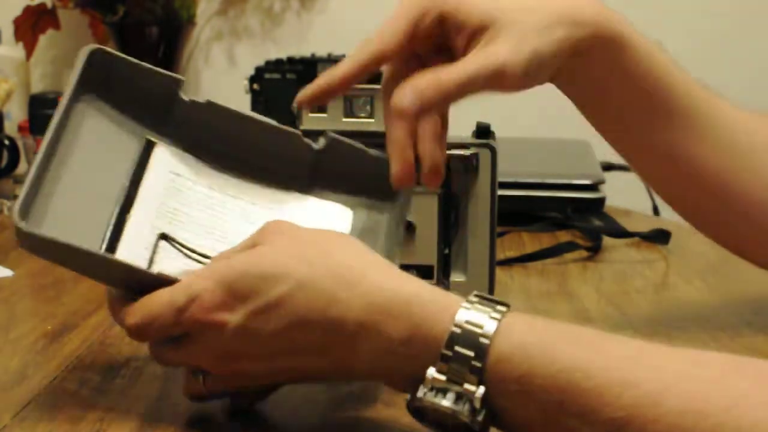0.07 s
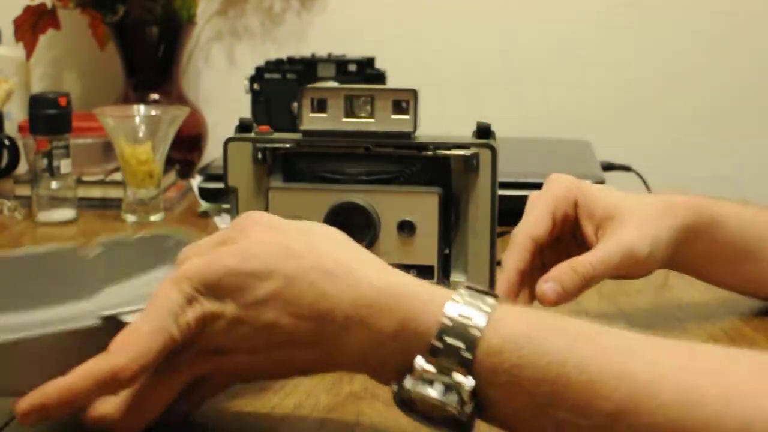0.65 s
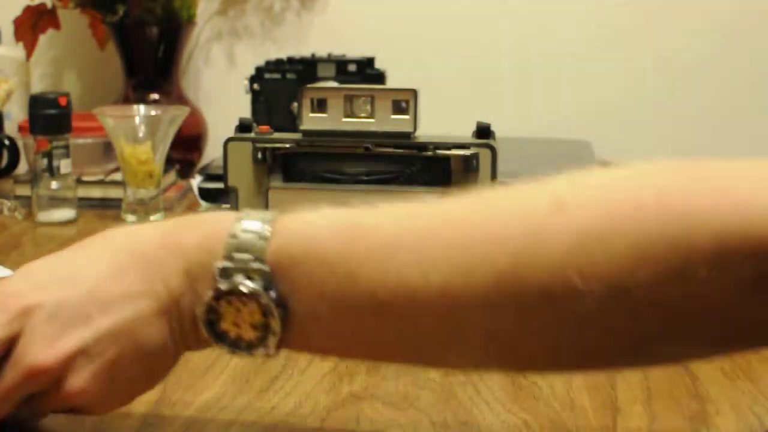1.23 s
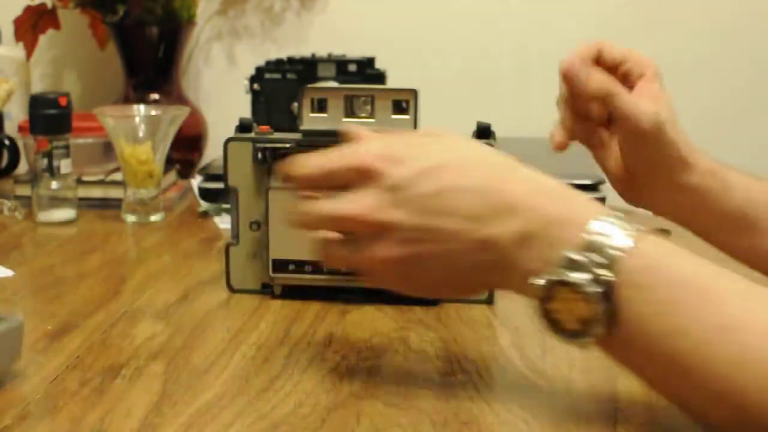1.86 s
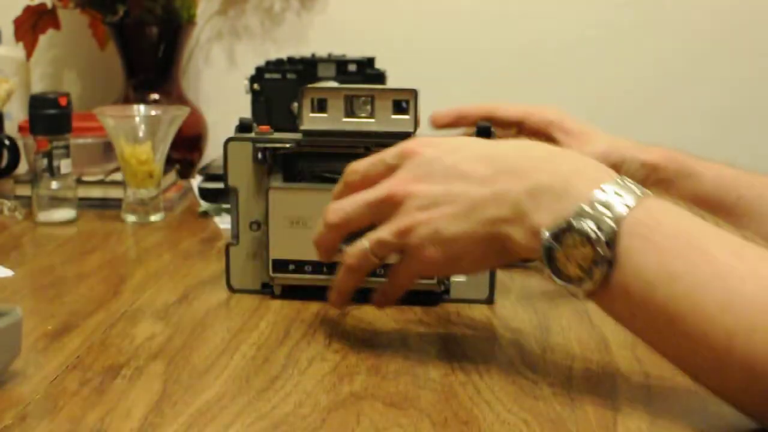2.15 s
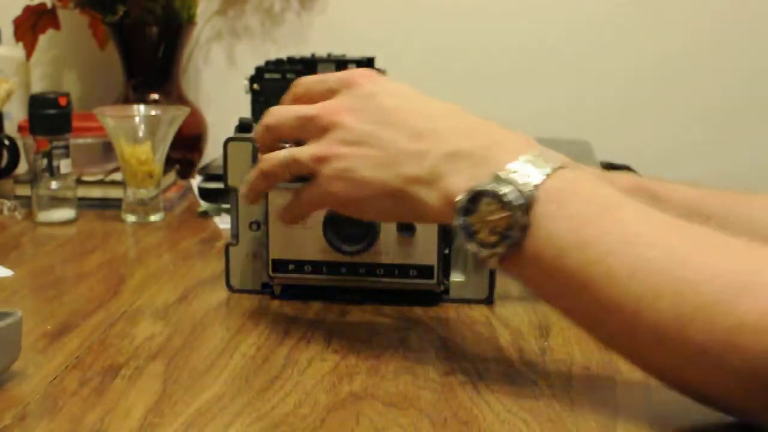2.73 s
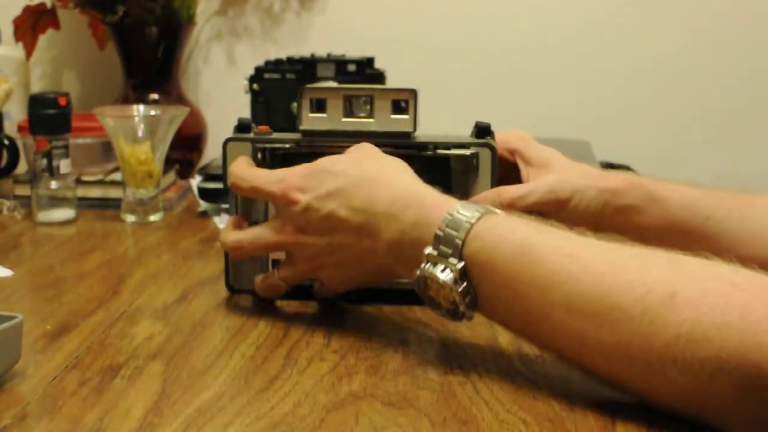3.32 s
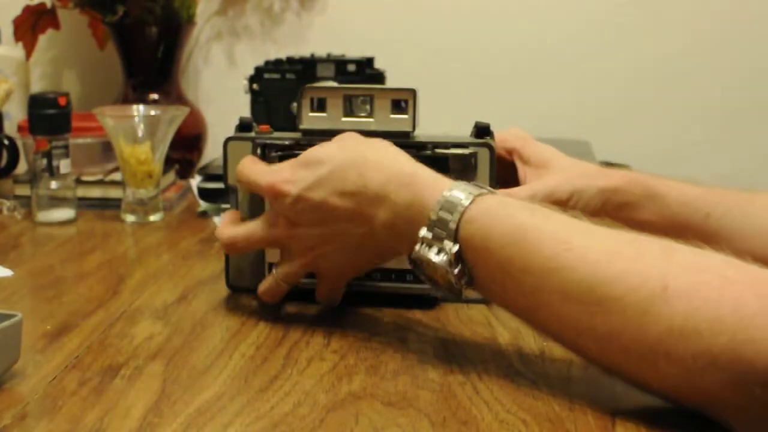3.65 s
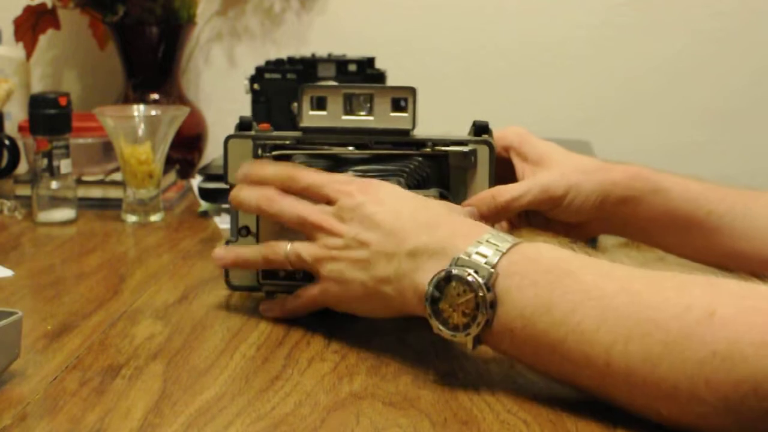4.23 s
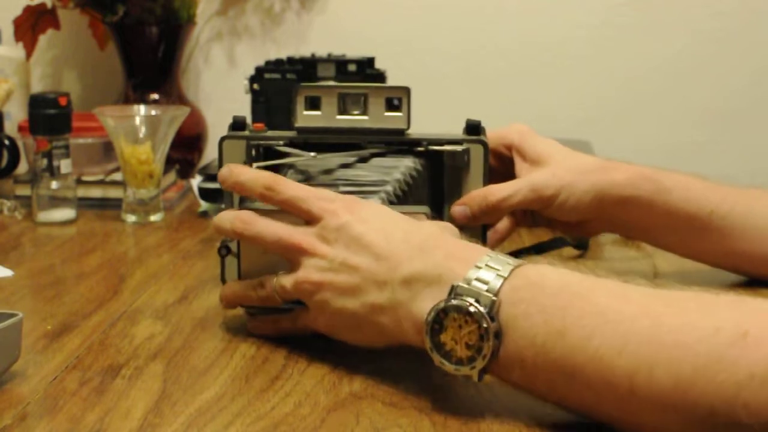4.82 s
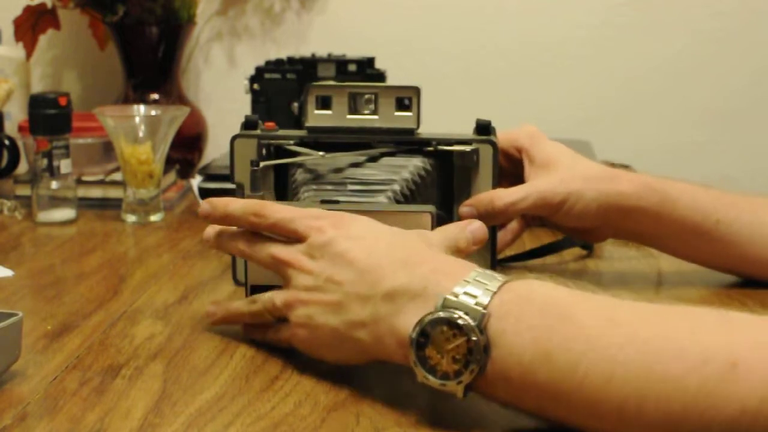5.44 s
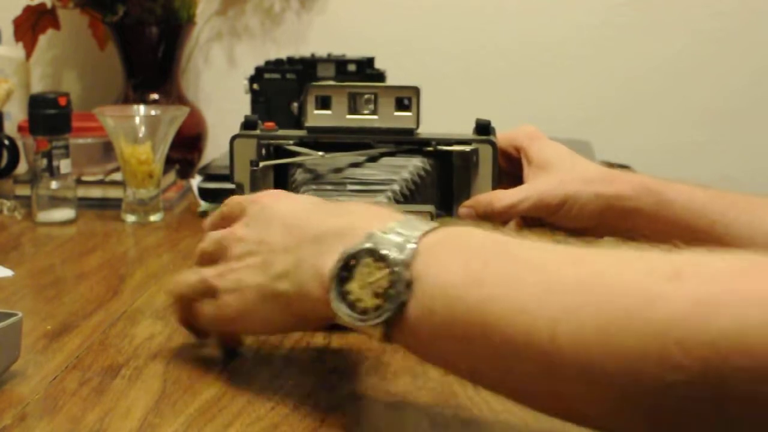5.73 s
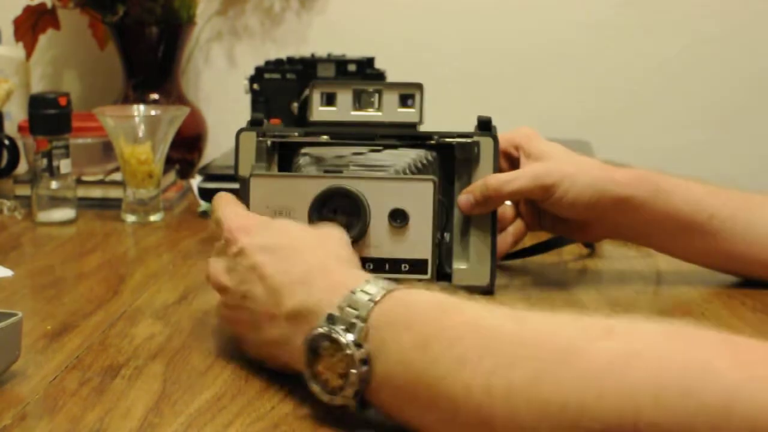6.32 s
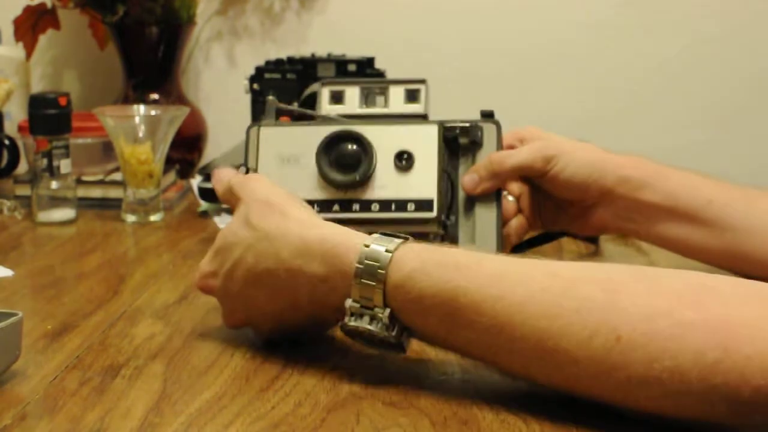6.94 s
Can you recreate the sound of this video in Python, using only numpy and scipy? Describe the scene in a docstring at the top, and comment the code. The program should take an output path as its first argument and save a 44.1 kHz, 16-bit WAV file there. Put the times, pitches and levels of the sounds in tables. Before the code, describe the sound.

A faint fan hums steadily in a small room. At about 0.9 seconds a hollow plastic cover taps sharply on a wooden table, then at 1.5 drops flat with a loud, quick bouncing clatter. Soft hand brushes and bumps follow until about 2.5. Around 3 seconds a folding camera gives a few small clicks, and at 3.6 its latch lets go with a sharp snap. The leather bellows creak quietly near 3.9, and a click comes at 4.2. Steel struts scrape briefly and lock at 4.5 with a very loud snap that rings the camera body, followed by a smaller one at 4.8. From 5 seconds to about 7, light irregular metal clicks and faint sliding continue as the front is pushed back in. The microphone is a little dull and overloads slightly on the hardest peak.

```python
"""A folding camera is unlatched and opened: leather bellows creak by stick-slip, steel struts scrape out
and lock with a snap that rings the body. Small clicks follow as the front is pushed back in.
Before that, its hollow plastic cover taps a wooden table, drops flat and bounces. Hands brush and bump;
a faint fan hums in the small room. The microphone is dull above 5 kHz and overloads on the hardest peak."""
import sys
import numpy as np
from scipy import signal
from scipy.fft import rfft
from scipy.io import wavfile

SR = 44100
rng = np.random.default_rng(int(sys.argv[2]) if len(sys.argv) > 2 else 0)


def master(y):
    """Save y as 16-bit WAV."""
    cut = np.clip(np.atleast_2d(y).T, -1, 1)
    pcm = np.round(cut * 32767)  # scale
    wavfile.write(sys.argv[1], SR, pcm.astype(np.int16))


N = 316197

# edges of the thud, knock, clack and snap bands: f/Hz
BAND_EDGES_HZ = [150, 500, 1100, 2500, 6000]


def amp(db):
    """Decibels to gain."""
    return 10 ** (np.asarray(db) / 20)


def unit(x):
    """Scale to energy 1."""
    return x / np.sqrt(np.sum(x ** 2) + 1e-20)


def read(points, hz):
    """Interpolate on a log-frequency axis."""
    f, value = np.transpose(points)
    return np.interp(np.log(hz + 1), np.log(f + 1), value)


def add(mix, s, sound):
    """Mix a sound in at time s."""
    part = mix[max(round(s * SR), 0):][:len(sound)]
    part += sound[:len(part)]


def colour(x, points, size=4096):
    """Minimum-phase filter through (f/Hz, gain/dB); attacks stay sharp."""
    log_gain = np.log(amp(read(points, abs(np.fft.fftfreq(size, 1 / SR)))))
    taps = np.fft.ifft(np.exp(signal.hilbert(log_gain).conj())).real[:size // 2]
    return signal.oaconvolve(x, taps)[:len(x)]


def drift(rate_hz):
    """Slow random wander."""
    knots = rng.standard_normal(1000)
    return np.interp(np.arange(N) / SR * rate_hz, np.arange(len(knots)), knots)


def room_tail(build_s=0.002, size=256):
    """Dense reflections: fast build-up, each band with its own decay."""
    # reverberant against direct sound: f/Hz, level/dB
    wet = [(100, -16.5), (175, 3), (240, 7), (380, 4.5), (700, -0.5), (1400, -7.5), (2800, -3), (5000, -8)]
    # room decay: f/Hz, t60/s
    decay = [(100, 0.35), (350, 0.36), (800, 0.4), (1500, 0.33), (3000, 0.36), (5500, 0.38)]
    hz, t, noise = signal.stft(rng.standard_normal(SR // 2), SR, nperseg=size)
    rate = np.log(1000) / read(decay, hz)[:, None]
    gain = np.sqrt(2 * rate / SR) * amp(read(wet, hz))[:, None]
    tail = signal.istft(noise * np.exp(-rate * t) * gain, SR, nperseg=size)[1]
    return tail * (1 - np.exp(-(np.arange(len(tail)) / SR / build_s) ** 2))


def strokes(rows):
    """Rubbing pressure: one bell-shaped swell per stroke."""
    t = np.arange(N) / SR
    return np.sqrt(sum((amp(db) * np.exp(-(2 * (t - s) / length) ** 2)) ** 2 for s, db, length in rows))


def rub(pressure, spectrum, per_s, spread_db, room_db):
    """Friction: many tiny uneven catches, scaled by pressure."""
    catches = (rng.random(N) < per_s / SR) * rng.standard_normal(N)
    catches *= amp(spread_db * np.minimum(rng.exponential(1, N), 4))
    direct = np.sqrt(N) * unit(colour(catches, spectrum)) * pressure
    return direct + amp(room_db) * signal.fftconvolve(direct, room_tail())[:N]


def contacts(rows, shares_db, lift_db=0, lift_octaves=0.5, pivot_hz=1100):
    """Hardness tilts the four band shares upward; a struck spot lifts those near its pitch."""
    centres_hz = np.sqrt(np.multiply(BAND_EDGES_HZ[:-1], BAND_EDGES_HZ[1:]))
    octaves = np.log2(centres_hz / pivot_hz)
    out = []
    for s, db, hardness, *spot_hz in rows:
        lift = sum(lift_db * np.exp(-(np.log2(centres_hz / hz) / lift_octaves) ** 2) for hz in spot_hz)
        out.append((s, db, *(np.array(shares_db) + hardness * octaves + lift), *spot_hz))
    return out


def rebounds(rows, after_s, gain_db):
    """Loose parts strike again, later and weaker."""
    delays = after_s * (.5 + rng.random(len(rows)))
    return [(s + delay, db + gain_db, *rest) for (s, db, *rest), delay in zip(rows, delays)]


def blows(rows, modes, dense_db, dense_t60_s, room_db, sub_db, spot_db=0, spot_t60_s=.03, scatter=1):
    """Each contact rings the main modes, any struck spot and a dense mass of small modes."""
    size = 8192
    t, hz, out = np.arange(size) / SR, np.fft.rfftfreq(size, 1 / SR), np.zeros(N)
    dying = lambda t60: np.exp(-np.log(1000) * t / t60)
    shapes = np.array([amp(db) * dying(t60) * np.exp(2j * np.pi * f * t) for f, db, t60 in modes])
    bands = list(zip(BAND_EDGES_HZ, BAND_EDGES_HZ[1:]))
    centres_hz = [np.sqrt(lo * hi) for lo, hi in bands]
    for s, db, thud, knock, clack, snap, *spot_hz in rows:
        # scatter 1: many parts, modes start out of step; 0: plain shell, in step
        phases = np.exp(2j * np.pi * scatter * rng.random(len(modes)))
        ring = unit((phases[:, None] * shapes).sum(0).imag)
        spot = sum(unit(dying(spot_t60_s) * np.sin(2 * np.pi * f * t)) for f in spot_hz)
        dense = unit(rng.standard_normal(size) * dying(dense_t60_s))
        hit = ring + amp(spot_db) * spot + amp(dense_db) * dense
        band_db = db + np.array([thud, knock, clack, snap])
        for _ in range(2):  # set band levels, as energy spread over 2 ms
            power = abs(rfft(hit)) ** 2 / size / (SR * .002)
            own_db = [10 * np.log10(power[(hz >= lo) & (hz < hi)].sum()) for lo, hi in bands]
            hit = colour(hit, list(zip(centres_hz, band_db - own_db)))
        # small things radiate little bass
        hit = colour(hit, [(25, sub_db - 10.5), (110, sub_db), (170, -11.0), (230, -0.5)])
        add(out, s, hit)
        add(out, s, amp(room_db) * signal.fftconvolve(hit, room_tail()))
    return out


def fan(air_db=-53.5, waver=0.0031):
    """Small fan: steady air noise and slightly wavering tones."""
    # air noise: f/Hz, level/dB
    spectrum = [(20, -14), (60, -14.5), (100, -11.5), (135, -8), (165, -7.5), (215, -2.5), (330, -4),
                (500, -9), (740, -6), (1200, -13.5), (2000, -15.5), (3200, -22), (4700, -22), (6000, -22)]
    # hum: f/Hz, rms level/dB
    tones = [(204.6, -60.5), (409.1, -61), (586.8, -67), (613.7, -71.5), (732.1, -68.5), (1330, -95)]
    air = amp(air_db) * np.sqrt(N) * unit(colour(rng.standard_normal(N), spectrum))
    clock_s = np.cumsum(1 + waver * drift(12)) / SR
    hum = sum(amp(db + drift(11)) * np.sin(2 * np.pi * (hz * clock_s + rng.random())) for hz, db in tones)
    return air + np.sqrt(2) * hum


def metal_slide(pull_s=4.25, lock_s=4.499, pull_db=-25.5, surge_s=0.023, steepness=1.48):
    """Metal on metal: light strokes, and struts scraping ever harder until they lock."""
    # strokes: mid t/s, level/dB, length/s
    slides = [(.48, -59.5, .13), (3.2, -57.5, 0.32), (3.52, -54.5, 0.089), (3.93, -61, 0.25),
              (4.95, -54, .27), (5.505, -47.5, 0.057), (6.3, -53, 0.16), (6.53, -56.5, 0.18),
              (6.82, -57, 0.36)]
    # sliding metal: f/Hz, level/dB
    spectrum = [(100, -15), (400, -5), (900, 0), (1500, -3.5), (2500, -8.5), (3500, -6.5), (4700, -6.5),
                (6000, -14.5)]
    left_s = lock_s - np.arange(N) / SR
    pulling = (left_s > 0) & (left_s < lock_s - pull_s)
    pull = amp(pull_db) * (1 + abs(left_s) / surge_s) ** -steepness * pulling
    return rub(strokes(slides) + pull, spectrum, per_s=6700, spread_db=1.5, room_db=0)


def hand_brush(grip_s=2.15, grip_db=-62):
    """Hands and leather rub body and table, loudest as the bellows pull taut."""
    # strokes: mid t/s, level/dB, length/s
    brushes = [(.85, -55.5, 1), (1.62, -50.5, 0.39), (1.85, -49.5, 0.086), (2.02, -52, 0.18),
               (3.72, -54, 0.25), (4.46, -49.5, 0.15), (4.565, -32.5, 0.077), (4.68, -51, 0.12),
               (6.58, -56, 0.3)]
    # skin and leather: f/Hz, level/dB
    spectrum = [(40, -32), (100, -8), (138, 10.5), (175, -10.5), (260, 0.5), (400, 9), (550, -5.5),
                (850, -0.5), (1500, -6.5), (3000, -20.5), (6000, -16.5)]
    grip = amp(grip_db) * (np.arange(N) / SR > grip_s)  # constant rustle once held
    return rub(np.hypot(strokes(brushes), grip), spectrum, per_s=1500, spread_db=2.5, room_db=-5.5)


def cover_taps(echo_s=.00292):
    """The rim of the hollow plastic cover taps and grazes the table."""
    # rim contacts: t/s, level/dB, hardness/(dB/octave)
    hits = [(.9033, -6, -0.5), (.964, -35.5, 9), (.982, -44, 14), (1.3285, -39, 6.5)]
    # shell modes: f/Hz, level/dB, t60/s
    modes = [(264, -22, .1), (390, -22, .08), (964, -13, .04), (1200, -7, .09), (1280, -9, .13),
             (1385, 0, .04), (1680, -5, .03), (1830, -9, .02), (2020, -9, .03), (2350, -15, .02),
             (2950, -20, .015), (3900, -20, .01), (4860, -25, .012)]
    taps = contacts(hits, shares_db=(-23, -17, -3, -24))
    shell = blows(taps, modes, dense_db=-9, dense_t60_s=.035, room_db=3.5, sub_db=-28, scatter=0)
    add(shell, echo_s, amp(-23) * shell)  # echo off the nearest surface
    shell = colour(shell, [(1400, -1), (2000, -3), (2800, 1), (4500, 5.5), (5600, -4.0)])  # soft plastic
    return shell + room_boom(taps, gain_db=-14.5, swell_s=0.03)


def room_boom(rows, gain_db, swell_s, mode_hz=136):
    """Each thud starts a low standing wave that swells and hangs on."""
    t, out = np.arange(SR) / SR, np.zeros(N)
    wave = t / swell_s * np.exp(1 - t / swell_s) * np.sin(2 * np.pi * mode_hz * t)
    for s, db, thud, *_ in rows:
        add(out, s, amp(gain_db + db + thud) * wave)
    return out


def table_knocks():
    """The wooden table rings as the cover drops, bounces and settles, and as the arm bumps it."""
    # cover landings: t/s, level/dB, hardness/(dB/octave)
    landings = [(1.444, -27, 1), (1.4523, -6, -0.5), (1.4543, -5.5, 1.5), (1.4695, -16.5, -2.5),
                (1.4765, -10, 0.6), (1.636, -34, 0.5), (1.762, -31, -3), (1.824, -39, 3.5)]
    # soft arm and hand bumps: t/s, level/dB
    bumps = [(1.665, -40), (1.86, -43), (1.962, -40.5), (2.058, -41), (2.254, -41.5), (2.551, -43),
             (4.076, -40.5)]
    # table modes: f/Hz, level/dB, t60/s
    modes = [(212.5, -8.5, 0.071), (304, -26, 0.11), (429, -5, 0.045), (447, -2, 0.037), (590, -18, 0.02),
             (755, -3, 0.039), (974, -5, 0.13), (1217, -1.5, 0.063), (1480, -11.5, 0.053), (2160, 2, 0.041),
             (2100, -18, 0.011), (2665, 4.5, 0.017), (2960, -4, 0.034), (3350, 9, 0.011),
             (3800, 8.5, 0.013), (4350, 8, 0.012), (5250, 12, 0.009)]
    knocks = contacts(landings, shares_db=(-14.5, -12, -9.5, -14.5))
    knocks += contacts([(s, db, 0) for s, db in bumps], shares_db=(-2.5, -11, -11.5, -22))
    wood = blows(knocks, modes, dense_db=3.5, dense_t60_s=0.086, room_db=-3.5, sub_db=-13)
    return wood + room_boom(knocks, gain_db=-21, swell_s=0.033)


def strut_clicks():
    """Steel struts and pivots click lightly and rebound."""
    # clicks: t/s, level/dB, hardness/(dB/octave), spot f/Hz
    hits = [(2.98, -29.5, 0.3, 904), (3.151, -39, 1, 5260), (3.158, -27.5, -1.5, 900),
            (4.107, -35, 3.3, 4360), (4.883, -33.5, 1.5, 2600), (4.968, -38.5, -0.5, 2660),
            (5.322, -38.5, 1.5, 3200), (5.394, -35, -1.5, 3120), (5.551, -37, -2, 4650),
            (5.594, -33, -1, 4270), (5.781, -29, 5.5, 5270), (5.784, -34, 0, 4100), (5.791, -42, 6.5, 2360),
            (5.911, -42.5, 1.5, 2940), (6.031, -49.5, 4.5, 4370), (6.149, -45.5, 0.5, 2800),
            (6.319, -35.5, 3.1, 4520), (6.48, -39, -1.5, 1670), (6.754, -36, 4.5, 4360),
            (6.809, -31.5, 4, 5200), (6.898, -44, 4.5, 3170), (7.078, -33.5, 4, 4200)]
    # strut modes: f/Hz, level/dB, t60/s
    modes = [(802, -3, .03), (1230, -7, .03), (1720, -6, .02), (2340, -1, .018), (2960, -3, .015),
             (3240, -6, .012), (3850, -6, .012), (4400, -1, .014), (4760, -1, .016), (5250, 3, .012),
             (5650, 5, .008)]
    clicks = contacts(hits, shares_db=(-20.5, -11, -12.5, -9))
    clicks += rebounds(clicks, after_s=.005, gain_db=-10.5)
    steel = blows(clicks, modes, dense_db=5.5, dense_t60_s=0.061, room_db=-2, sub_db=-14,
                  spot_db=-3.5, spot_t60_s=0.015)
    return colour(steel, [(300, -1.8), (700, 0.9)])  # thin steel: weak lows


def latch_snaps():
    """The camera body rings as the latch lets go, the struts lock and it shifts in the hand."""
    # snaps: t/s, level/dB, hardness/(dB/octave), spot f/Hz
    hits = [(3.082, -29, -2.5, 1020), (3.218, -26, -1.5, 1900), (3.2235, -39, -3.5, 677),
            (3.5707, -16, -1.5, 660), (3.575, -6, 1.2, 1895), (3.6825, -29.5, 0.5, 1780),
            (3.7215, -30, -1, 1880), (4.1865, -29, 1, 3400), (4.1923, -19.5, 3, 1026),
            (4.4995, -1.5, 2.5, 1584), (4.502, -9, -2.5, 430), (4.8035, -19.5, 3.5, 1286),
            (6.534, -30, -0.5, 1330)]
    # body modes: f/Hz, level/dB, t60/s
    modes = [(420, -5, .08), (620, -6, .035), (700, -7, .035), (855, 1, .045), (995, -4, .035),
             (1340, -3, .025), (1570, 0, .025), (1690, -3, .02), (1940, -4, .02), (2100, -6, .015),
             (2360, -3, .02), (2680, -7, .015), (3340, -5, .012), (3900, 0, .012), (4200, -4, .012),
             (4670, -2, .012), (5000, 2, .012)]
    snaps = contacts(hits, shares_db=(-23.5, -13.5, -16.5, -14), lift_db=7)
    rattle = rebounds(snaps, after_s=0.007, gain_db=-18)
    body = blows(snaps + rattle, modes, dense_db=6.5, dense_t60_s=0.05, room_db=-1.5, sub_db=-6.5,
                 spot_db=-2.5, spot_t60_s=0.017)
    return body + room_boom(snaps, gain_db=-17, swell_s=0.05)


def bellows_creak(from_s=3.873, to_s=3.99, jitter_s=0.0038, lesser_db=-36.5, fade_db_per_s=60,
                  slip_hz=1400, spread_octaves=0.28):
    """Folds stick and slip as they part: strong slips plus a fading run, each at its own pitch."""
    # strong slips: t/s, level/dB
    strong = [(3.845, -35.5), (3.865, -33), (3.891, -32.5), (3.9161, -30), (3.926, -35.5), (3.9599, -38),
              (4.366, -37)]
    # fold modes: f/Hz, level/dB, t60/s
    modes = [(680, -2.5, 0.009), (1080, 4.5, 0.013), (1465, -7.5, 0.004), (1736, -1.5, 0.0042),
             (4180, -23, 0.0014)]
    times_s = np.linspace(from_s, to_s, 7) + jitter_s * rng.standard_normal(7)
    lesser = [(s, lesser_db - fade_db_per_s * (s - from_s)) for s in times_s]
    shares_db = (-21, -5.5, -6, -16.5)
    slips = [(s, db, *shares_db, slip_hz * 2 ** (spread_octaves * rng.standard_normal()))
             for s, db in strong + lesser]
    creak = blows(slips, modes, dense_db=-3, dense_t60_s=.012, room_db=0.5, sub_db=-28.5,
                  spot_db=4, spot_t60_s=0.015)
    # soft leather dulls each slip
    return colour(creak, [(600, 2.5), (1000, -3.5), (1900, 1.5), (2700, -4.0), (5000, -1.5)])


def scene():
    """Cover, camera and hands in the humming room."""
    cover = cover_taps() + table_knocks()
    camera = latch_snaps() + strut_clicks() + bellows_creak() + metal_slide()
    return (cover + camera + hand_brush() + fan())[None]


def record(dry):
    """Dull microphone, peak overload, band limit."""
    # microphone response: f/Hz, gain/dB
    response = [(20, -12), (100, 0.5), (4900, -0.5), (5350, -6.5), (5800, -14.5), (6150, -31),
                (6600, -53.5), (8000, -54.5), (16000, -108.5)]
    ceiling, edge_hz = .7, 16500
    clipped = np.clip(colour(dry[0], response), -ceiling, ceiling)
    lowpass = signal.firwin(511, edge_hz, window=("kaiser", 9), fs=SR)
    return signal.oaconvolve(clipped, lowpass, "same")[None]


dry = scene()
out = record(dry)
master(out)
```